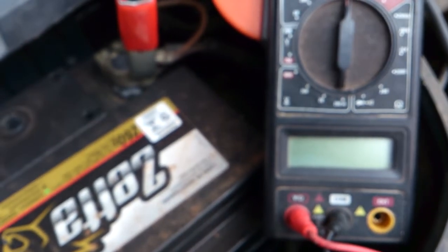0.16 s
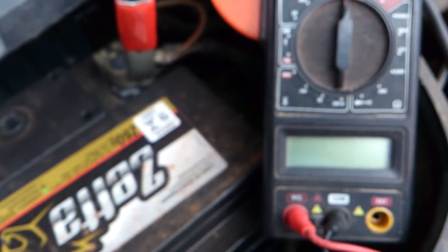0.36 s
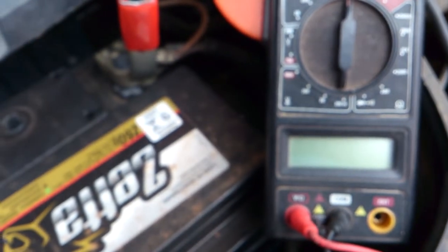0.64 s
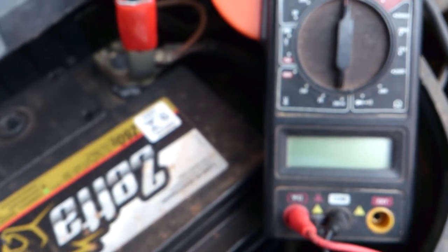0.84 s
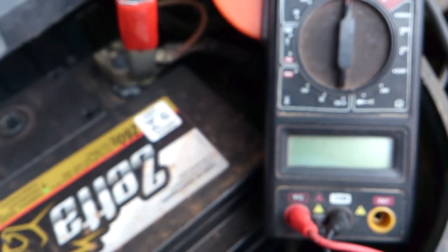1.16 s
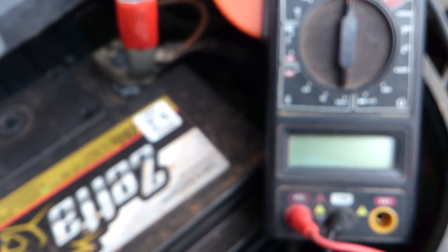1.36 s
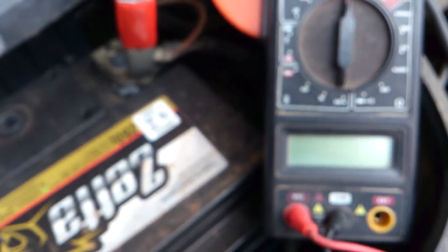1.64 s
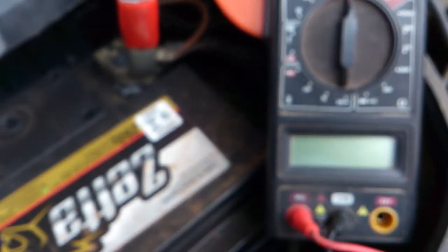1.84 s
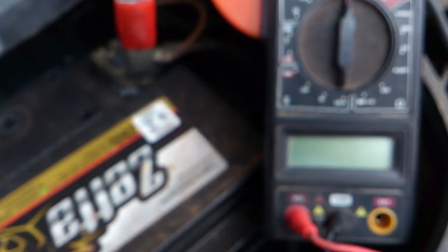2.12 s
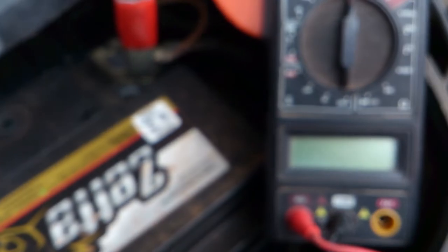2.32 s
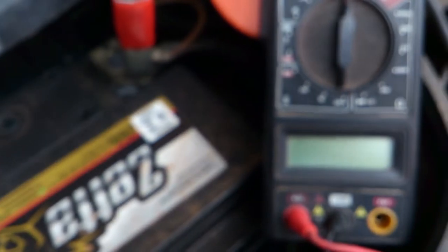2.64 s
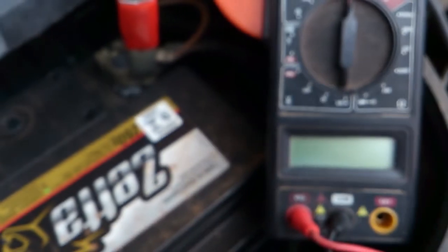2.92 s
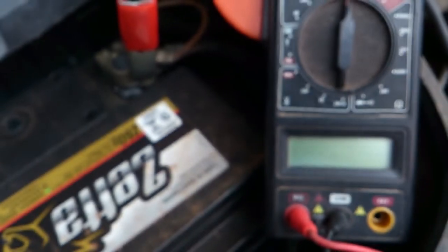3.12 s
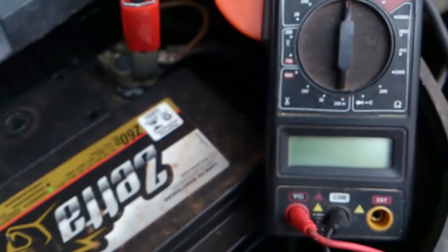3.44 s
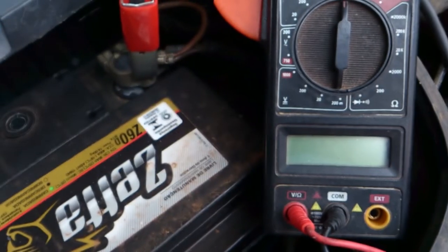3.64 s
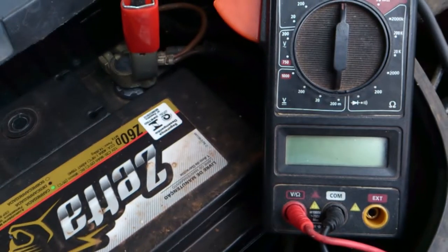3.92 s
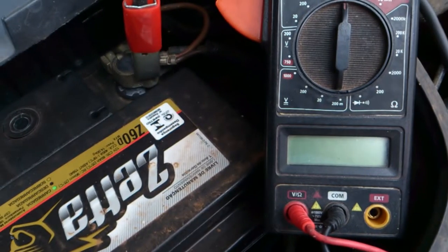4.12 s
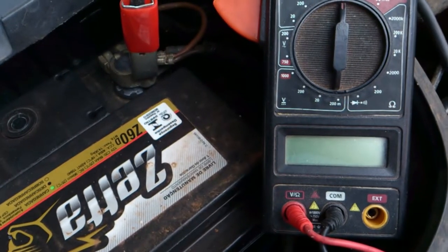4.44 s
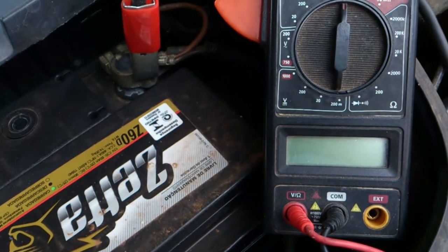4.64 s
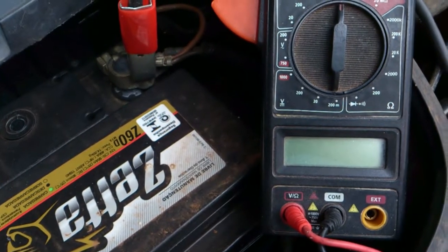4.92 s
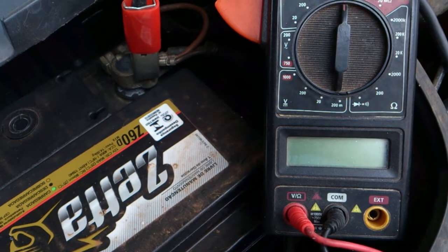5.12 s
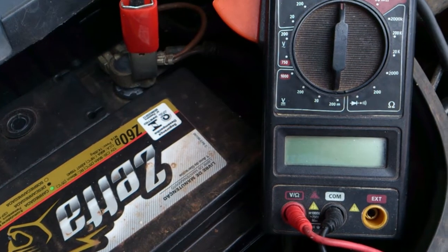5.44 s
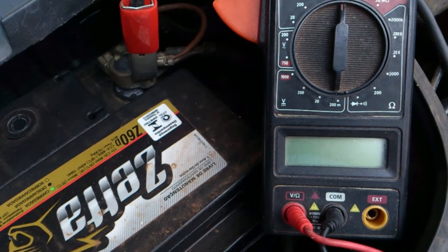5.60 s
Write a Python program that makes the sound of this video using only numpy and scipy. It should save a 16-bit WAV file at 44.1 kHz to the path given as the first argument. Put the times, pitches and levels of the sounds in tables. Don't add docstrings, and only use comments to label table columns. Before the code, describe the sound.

Close over a car's engine bay in a workshop, an engine idles with bright metallic ticking about eight times a second over a low boom and hiss. A spark snaps early and one cycle nearly misses. Switched off midway, it slows with a clack, a thump and whistling, rushing air. Then come scuffing, dull thuds, a hollow panel knock, thin hinge squeaks and small clicks over a faint distant engine drone.

```python
import sys
import numpy as np
from scipy import signal
from scipy.fft import rfft, irfft, next_fast_len
from scipy.io import wavfile
from scipy.ndimage import uniform_filter1d

SR = 44100
rng = np.random.default_rng(int(sys.argv[2]) if len(sys.argv) > 2 else 0)


def boost_factor(decibels):
    exponent = np.asarray(decibels, float) / 20
    return 10 ** exponent


def master_out(mix):
    frames = np.transpose(np.atleast_2d(mix))
    ceiling = np.clip(frames, -1, 1)
    pcm = np.round(ceiling * 32767).astype(np.int16)
    wavfile.write(sys.argv[1], SR, pcm)


N = 254438
TIME_S = np.arange(N) / SR

# (time [s], peak level [dB])
TAPPET_SNAPS = [(0.0865, -10), (0.2083, -11), (0.3286, -10), (0.4544, -12), (0.5768, -11), (0.6975, -10.5),
                (0.8187, -10.5), (0.9396, -11), (1.0589, -10.5), (1.1813, -11), (1.301, -10),
                (1.4205, -10.5), (1.5406, -10), (1.6615, -10.5), (1.7823, -10), (1.9031, -11),
                (2.0232, -9.5), (2.1439, -10), (2.266, -11.5), (2.3878, -11), (2.5106, -10.5),
                (2.631, -10.5), (2.7535, -11), (2.8738, -10.5), (2.995, -12.5), (3.116, -10), (3.248, -14),
                (3.4121, -15), (3.6531, -20.5), (4.0504, -42.5)]


def valve_gear(fresh=0.35, scatter_db=1.07, gear_db=-17, loose=0.49):
    # (delay [ms], cover level [dB], rocker level [dB], block level [dB], rattle length [ms])
    bounces = [
        (0, 3, -6.5, -29, 2.6),
        (1.6, 1, 1, -13, 4.5),
        (7.5, 0, -8.5, -8, 7.6),
    ]
    # (share of cycle [0-1], cover level [dB], rocker level [dB], block level [dB], rattle length [ms])
    soft_contacts = [(.27, -6.5, -32, -28, 4.7), (.296, -4, -34, -28.5, 6.7), (.39, -19, -42, -26, 5.2),
                     (.454, -27, -25, -18, 3.9), (0.506, -8, -40, -24.5, 3.6),
                     (.547, -4.5, -21, -19.5, 7.3), (.647, -21, -30, -11.5, 4.3),
                     (.701, -6.5, -20.5, -4, 11), (.769, -10, -13.5, -5, 11.6),
                     (.849, -33.5, -34.5, -13.5, 6.9), (.896, -16.5, -41, -15.5, 8.9)]
    # (frequency [Hz], level [dB], time to fall 60 dB [s])
    cover_modes = [(4340, -7, 0.001), (6160, 6, 0.0021), (6820, 9.5, 0.0012), (9090, 5.5, 0.0033),
                   (9270, 1, 0.012), (9960, 5.5, 0.0027), (11400, 5.5, 0.0016), (12490, 1.5, 0.0021),
                   (13493, -7, 0.002557), (15000, -13, 0.002077)]
    # (frequency [Hz], level [dB], time to fall 60 dB [s])
    rocker_modes = [(5197, 2.5, 0.026), (5680, -16.5, 0.015), (5200, 1.5, 0.0023)]
    # (frequency [Hz], level [dB], time to fall 60 dB [s])
    block_modes = [(547, -12.5, 0.03), (1014, -11, 0.036), (1760, -9.5, 0.013), (2168, -4, 0.017),
                   (2320, -4, 0.012), (2560, -3, 0.007), (3300, -2.5, 0.005), (4100, -2.5, 0.0053)]
    # (frequency [Hz], level [dB], time to fall 60 dB [s])
    spring_modes = [(3515.3, -14, .015), (4235, -14, 0.035), (7090, -3, 0.03)]

    starts = cycle_times()
    tappet_s, peak_db = np.transpose(TAPPET_SNAPS)
    contacts = [(starts + delay_ms / 1000, *rest) for delay_ms, *rest in bounces]
    contacts += [(starts[:-1] + share * np.diff(starts), *rest) for share, *rest in soft_contacts]

    force = np.zeros((3, N))
    t = np.arange(900) / SR
    blow = 1. * (t == 0)
    for times, *part_db, rattle_ms in contacts:
        habit = rng.standard_normal(900)
        dying = np.exp(-2000 * t / rattle_ms) / np.sqrt(rattle_ms * SR / 4000)
        for at in times:
            rattle = 4 * (habit + fresh * rng.standard_normal(900)) * dying
            on_rocker = 4 * blow + 0.039 * rattle
            on_block = rattle + loose * 4 * rng.standard_normal(900) * dying
            strength_db = np.interp(at, tappet_s, peak_db) + gear_db + np.array(part_db)
            strength = boost_factor(strength_db + scatter_db * rng.standard_normal(3))
            add(force, at, np.array([rattle, on_rocker, on_block]) * strength[:, None])

    late = np.r_[np.zeros(round(.0045 * SR)), force[1]][:N]
    cover = above(ring(force[0], cover_modes), 3222)
    rocker = ring(force[1], rocker_modes)
    block = above(ring(force[2], block_modes), 444.45)
    return cover + rocker + ring(late, spring_modes) + block


def engine_air():
    starts = cycle_times()
    cycle = np.interp(TIME_S, starts, np.arange(len(starts)))
    return crank_turning() * (intake_boom(cycle) + trembling_block() + hiss_and_whine(cycle))


def intake_boom(cycle, idle_db=-30.5, sag_db_per_s2=38, duct_db=46):
    cylinder_db = [
        -9,
        -3,
        0,
        -3,
    ]
    # (frequency [Hz], level [dB], time to fall 60 dB [s])
    box_modes = [(134.5, 0, .085)]
    # (frequency [Hz], level [dB], time to fall 60 dB [s])
    pipe_modes = [(232, -28, .25), (66, -30, .1), (430, -29, .15), (545, -27, .08), (166, -24, .3)]
    misfire_s, misfire_half_s, misfire_loss_db = 0.498, 0.099, 21
    switch_off_s = 3.03

    firing = np.floor(4 * (cycle + .15)).astype(int)
    at = np.flatnonzero(np.diff(firing, prepend=firing[0]))
    pulses = np.zeros(N)
    pulses[at] = boost_factor(np.array(cylinder_db)[firing[at] % 4] + .8 * rng.standard_normal(len(at)))
    boom = ring(ring(pulses, box_modes), box_modes) + boost_factor(duct_db) * ring(pulses, pipe_modes)
    boom /= np.sqrt(abs(uniform_filter1d(boom ** 2, SR // 4))) + 1

    misfire = np.maximum(1 - abs(TIME_S - misfire_s) / misfire_half_s, 0)
    sag_db = sag_db_per_s2 * np.maximum(TIME_S - switch_off_s, 0) ** 2
    return boost_factor(idle_db - misfire_loss_db * misfire - sag_db + 0.27 * drift(15)) * boom


def trembling_block():
    # (time [s], level [dB], rise [s], hold [s], fall [s])
    kicks = [
        (.52, -38.5, .15, .03, 0.1),
        (3.2, -43, .08, .07, .25),
        (3.46, -43, .15, 0.044, 0.22),
    ]
    return (boost_factor(-58) + swells(kicks)) * blown([(58.4, 9, 1), (64.0, 7.3, -3)])


def hiss_and_whine(cycle, whine_db=-50, throb_db=0.5):
    # (frequency [Hz], level per Hz [dB])
    hiss_colour = [(110, -32), (180, 0), (1370, -1.5), (2190, -3.5), (3010, -5), (5280, -9), (6030, -9),
                   (9460, -6.5), (11600, -12), (13800, -9.5), (16000, -37)]
    hiss = coloured(hiss_colour) * boost_factor(throb_db * np.cos(8 * np.pi * (cycle - .04)) + 1.2 * drift(35))
    hiss -= .35 * above(hiss, 10500)
    speed = np.clip(uniform_filter1d(np.gradient(cycle), 9000) * SR / 8.3, 0, 1)
    hiss_db = -33 + 20 * np.log10(speed + 0.0054)
    hiss -= (1 - speed) * above(hiss, 6542)
    turns = 176.5 * uniform_filter1d(cycle, 9000)
    whine = np.sin(2 * np.pi * turns + 0.45 * drift(20)) * boost_factor(whine_db + 3.6 * drift(8))
    return boost_factor(hiss_db) * hiss + whine * boost_factor(hiss_db + 36)


def inrush(width_hz=38, side_db=-5):
    # (time [s], frequency [Hz])
    whistle_pitch = [(3.3, 1175), (3.39, 1120), (3.44, 1186), (3.68, 1193), (3.795, 1072), (3.85, 1134)]
    # (frequency [Hz], width [Hz], level [dB])
    side_tones = [(1036, 19.23, 2), (1184, 45, -2), (1203, 25, 0.5), (1316, 29, -2.5)]
    # (frequency [Hz], width [Hz], level [dB])
    rush_tones = [(1992.1, 320, -4), (2730, 51, 5.5), (3210, 130, 8), (3550, 130, -3), (3830, 130, 3.5),
                  (4764, 624, -8.5), (6000, 930, -0.5), (7710, 894, -8), (9618, 830, -5.5)]
    # (time [s], whistle level [dB], rush level [dB])
    gulps = [
        (3.286, -30.5, -32),
        (3.368, -33, -43),
        (3.462, -44, -36),
    ]
    gulp_rise_s, gulp_fall_s = 0.019, 0.021
    draw_s, draw_rise_s = 3.43, 0.02
    whistle_end_s, whistle_end_db_per_s = 3.8, 110

    since = TIME_S - draw_s
    draw = boost_factor(20 * np.minimum(since / draw_rise_s, 0)) * crank_turning()
    ending_db = whistle_end_db_per_s * np.maximum(TIME_S - whistle_end_s, 0)
    whistle_gain = draw * boost_factor(-34.5 - 4 * since + 1.8 * drift(20) - ending_db)
    whistle_gain += swells([(s, db, gulp_rise_s, 0, gulp_fall_s) for s, db, _ in gulps])
    rush_gain = draw * boost_factor(-40 + 10 * since)
    rush_gain += swells([(s, db, gulp_rise_s, 0, gulp_fall_s) for s, _, db in gulps])

    whistle_hz, = in_time(whistle_pitch)
    phase = 2 * np.pi * np.cumsum(whistle_hz * (1 + 0.0121 * drift(23.8))) / SR
    whistle = drift(width_hz) * np.cos(phase) + drift(width_hz) * np.sin(phase)
    whistle += boost_factor(side_db) * blown(side_tones)
    broad = [(hz, 1.7 * width, level_db + 10 * np.log10(width)) for hz, width, level_db in rush_tones]
    rush = below(patchy(broad, patchy_db=2.0, rate=33), 11000)
    return boost_factor(-2) * whistle_gain * whistle + boost_factor(1) * rush_gain * above(rush, 1200.0)


def stray_spark():
    # (time [s], peak level [dB])
    snaps = [
        (0.3566, 1),
        (0.3604, -25),
        (0.365, -13),
    ]
    return crack(snaps, 0.014, [6500, 12500], -2.5) + crack(snaps, 0.016, [1800, 4800], -10)


def run_down_blows():
    # (time [s], peak level [dB])
    relay = [
        (3.361, -24),
    ]
    # (time [s], peak level [dB])
    shudder = [
        (3.39, -26.5),
    ]
    return crack(relay, 0.035, [1900, 4200], 3.5) + crack(shudder, 0.12, [250, 900], 8.8)


def thuds():
    # (time [s], peak level [dB], lowest tone [Hz])
    blows = [
        (3.387, -33, 198),
        (4.212, -28, 360),
        (4.232, -37, 445.1),
        (4.293, -36.5, 359),
        (5.304, -41, 165.4),
    ]
    out, t = np.zeros(N), np.arange(12000) / SR
    # (times the lowest tone, level [dB], time to fall 60 dB [s])
    overtones = [(1.0, 4, 0.076), (1.35, 4, 0.031), (1.9, -4, 0.0375), (2.5, -1, 0.02086)]
    for s, peak_db, hz in blows:
        for ratio, part_db, t60 in overtones:
            tone = np.sin(2 * np.pi * hz * ratio * t) * (1 - np.exp(-t / 0.0036))
            add(out, s, boost_factor(peak_db + part_db - 60 * t / t60) * tone)
    return out + crack([(s, peak_db) for s, peak_db, hz in blows], 0.091, [300, 1000], 6.8)


def scuff():
    # (time [s], level [dB], rise [s], hold [s], fall [s])
    strokes = [
        (3.93, -47.5, 0.087, 0.014, 0.086),
        (4.052, -56, 0.033, .003, 0.018),
        (4.11, -55.5, 0.048, 0.034, .1),
        (4.18, -42, 0.14, 0.03, 0.054),
        (4.33, -55.5, .1, .02, 0.22),
        (4.6, -68, .1, .03, .1),
    ]
    # (frequency [Hz], width [Hz], level [dB])
    rubbed = [(1060, 170, -4), (1520, 270, -7), (2090, 200, -2.5), (2670, 720, -6.5), (3250, 360, -3),
              (3700, 450, -3.5), (4940, 400, -7), (5900, 1200, -3), (7700, 320, -9), (9600, 2300, -2.5)]
    return swells(strokes) * boost_factor(1.5 * drift(60)) * below(patchy(rubbed, patchy_db=3.5, rate=13), 10800)


def settling_block():
    # (time [s], level [dB], rise [s], hold [s], fall [s])
    settling = [
        (3.92, -48.5, 0.054, 0.041, 0.23),
    ]
    # (frequency [Hz], width [Hz], level [dB])
    body = [(330, 440, -0.98), (720, 560, -1.1)]
    return swells(settling) * blown(body)


def panel_knock():
    # (time [s], level [dB], rise [s], hold [s], fall [s])
    shakes = [
        (4.7, -29, 0.053, 0.031, 0.13),
        (4.91, -50, 0.027, 0.0046, .08),
    ]
    # (frequency [Hz], width [Hz], level [dB])
    panel = [(60.12, 20, -3), (98, 13, -1), (155, 29, 0), (292.62, 39, -8), (354, 26, -5.5), (481, 47, -6),
             (546, 33, -21)]
    # (time [s], level [dB], rise [s], hold [s], fall [s])
    slaps = [
        (4.69, -34.5, 0.025, 0.037, 0.089),
    ]
    # (frequency [Hz], level per Hz [dB])
    slap_colour = [(350, -23), (600, 4.5), (677, -1.5), (2040, -6), (4840, -9.5), (7450, -17.5),
                   (10300, -10), (13500, -29), (15800, -45)]
    # (time [s], peak level [dB], frequency [Hz], time to fall 60 dB [s])
    booms = [
        (4.698, -21.5, 96, .25),
        (4.752, -24, 58, .2),
        (4.788, -30, 130, .15),
    ]
    knock = swells(shakes) * boost_factor(3.8 * drift(29.0)) * blown(panel)
    knock += swells(slaps) * boost_factor(2.3 * drift(59)) * coloured(slap_colour)
    t = np.arange(12000) / SR
    for s, peak_db, hz, t60 in booms:
        add(knock, s, boost_factor(peak_db - 60 * t / t60) * np.sin(2 * np.pi * hz * t) * (t < t[-1]))
    return knock


def squeaks(fall=.015, third_db=-12, trim_db=-3):
    # (time [s], peak level [dB], pitch [Hz], length [ms], octave level [dB])
    hinge_squeaks = [(4.30, -50, 3300, 26.4, -7), (4.368, -51, 3550, 17, -16),
                     (4.595, -57.5, 3598, 45, -14), (4.75, -42, 5750, 20, -16),
                     (4.82, -47, 5900, 29, -13.5), (4.853, -52, 5140, 17, 6), (4.874, -50, 4200, 24, -8),
                     (4.908, -46.5, 5620, 36, -5), (4.945, -53, 5380, 21.35, 6),
                     (4.988, -52, 5200, 19.6, 3.5), (5.078, -47, 3550, 16.18, -8.5),
                     (5.115, -49.5, 3500, 30, -8), (5.152, -50, 3500, 25.25, -8),
                     (5.66, -59, 1454, 120, -20.5), (5.63, -68.5, 2020, 110, -20)]
    out = np.zeros(N)
    for s, peak_db, hz, length_ms, octave_db in hinge_squeaks:
        u = np.linspace(0, 1, round(length_ms * SR / 1000))
        wobble, grip = uniform_filter1d(rng.standard_normal((2, len(u))), size=60) * np.sqrt(60)
        phase = 2 * np.pi * np.cumsum(hz * (1 + fall * (.5 - u) + .014 * wobble)) / SR
        tone = np.sin(phase) + boost_factor(octave_db) * np.sin(2 * phase)
        tone += boost_factor(third_db) * (hz < 4000) * np.sin(3 * phase)
        add(out, s, boost_factor(peak_db + trim_db + 3.0 * grip) * tone * np.sin(np.pi * u ** 0.39))
    return out


def clicks():
    # (time [s], peak level [dB])
    touches = [(3.9969, -33), (4.0487, -38), (4.2334, -29.5), (4.6862, -37), (5.3122, -28.5), (5.4087, -42)]
    return crack(touches, 0.052, [1400, 10500], -11.0)


def background():
    # (time [s], firing rate [Hz], level [dB], load [0-1])
    far_engine = [(3.92, 49, -75, 0), (4.04, 50.2, -43.5, 0.02), (4.3, 52.3, -41, 0), (4.43, 50.2, -64, .2),
                  (4.54, 48.83, -49, 0.2), (4.9, 53.3, -43, 0.16), (5.22, 53.83, -45.5, .5),
                  (5.34, 56.2, -43.5, 0.8), (5.7, 57.3, -40.5, 1), (5.77, 59, -42, 0.6)]
    idling_db = [0.5, -4.5, -27, -23]
    under_load_db = [2.5, -24, -10, -9]
    # (frequency [Hz], level per Hz [dB])
    shop_air = [(18, -29), (30, 5.5), (70, 4), (109, 1.5), (199, -6.5), (415, -15.5), (822, -16),
                (988, -11.5), (1160, -20), (2230, -20), (5310, -28.5), (9710, -28), (16000, -40.5)]
    # (frequency [Hz], width [Hz], level [dB])
    lamp = [(9700, 200, 0)]
    hz, level_db, load = in_time(far_engine)
    phase = 2 * np.pi * np.cumsum(hz) / SR
    drone = 0
    for k, (idle_db, loaded_db) in enumerate(zip(idling_db, under_load_db)):
        harmonic_db = level_db + idle_db + load * (loaded_db - idle_db) + 1.7 * drift(19)
        drone = drone + boost_factor(harmonic_db) * np.cos((k + 1) * phase)
    return drone + boost_factor(-49.5 + 0.51 * drift(3)) * coloured(shop_air) + boost_factor(-74) * blown(lamp)


def shop(x, t60=0.56):
    t = np.arange(round(.6 * SR)) / SR
    tail = signal.lfilter([.3], [1, -.7], rng.standard_normal(len(t))) * boost_factor(-60 * t / t60) * (t > .008)
    return signal.fftconvolve(x, tail / np.sqrt(np.sum(tail ** 2)))[:N]


def cycle_times():
    s = np.array(TAPPET_SNAPS)[:, 0]
    return np.r_[2 * s[0] - s[1], s]


def crank_turning():
    return boost_factor(-324 * np.maximum(TIME_S - 3.872, 0))


def crack(events, t60, edge_hz, trim_db):
    out, t = np.zeros(N), np.arange(3000) / SR
    for s, peak_db in events:
        splinters = rng.standard_normal(3000) * (boost_factor(-60 * t / t60) + 0.19 * boost_factor(-12 * t / t60))
        add(out, s, boost_factor(peak_db + trim_db) * (splinters + 2.143 * (t == 0)))
    return signal.sosfilt(signal.butter(2, edge_hz, "band", fs=SR, output="sos"), out)


def ring(force, modes):
    out = 0
    for k, (hz, level_db, t60) in enumerate(modes):
        r, w = boost_factor(-60 / (t60 * SR)), 2 * np.pi * hz / SR
        mode = signal.lfilter([0, np.sin(w)], [1, -2 * r * np.cos(w), r * r], force + 1e-18)
        out = out + (-1) ** k * boost_factor(level_db) * mode
    return out


def blown(peaks):
    modes = [(hz, db + 10 * np.log10(width), np.log(1000) / np.pi / width) for hz, width, db in peaks]
    return rms_one(ring(rng.standard_normal(N), modes))


def patchy(peaks, patchy_db, rate):
    return rms_one(sum(boost_factor(level_db + patchy_db * drift(rate)) * blown([(hz, width, 0)])
                       for hz, width, level_db in peaks))


def coloured(spectrum):
    size = 2 * next_fast_len(N // 2 + 1)
    hz = np.arange(size // 2 + 1) * SR / size + 1
    points = np.array(spectrum)
    gain = boost_factor(np.interp(np.log(hz), np.log(points[:, 0]), points[:, 1]))
    return rms_one(irfft(rfft(rng.standard_normal(size)) * gain)[:N])


def drift(rate):
    r = np.exp(-80 * np.pi * rate / SR)
    slow = signal.lfilter([1], [1, -2 * r, r * r], rng.standard_normal(N // 40 + 2002))[2000:]
    return np.interp(np.arange(N) / 40, np.arange(len(slow)), rms_one(slow))


def swells(rows):
    t = TIME_S
    return sum(boost_factor(db - 20 * np.maximum(np.maximum((s - t) / rise, (t - s - hold) / fall), 0))
               for s, db, rise, hold, fall in rows)


def in_time(rows):
    s, *columns = np.transpose(rows)
    return [np.interp(TIME_S, s, c) for c in columns]


def add(track, s, sound):
    i = round(s * SR)
    if 0 <= i < N:
        track[..., i:i + sound.shape[-1]] += sound[..., :N - i]


def rms_one(x):
    return x / np.sqrt(np.mean(x ** 2) + 1e-20)


def above(x, edge_hz):
    return signal.sosfilt(signal.butter(2, edge_hz, "high", fs=SR, output="sos"), x)


def below(x, edge_hz):
    return signal.sosfilt(signal.butter(2, edge_hz, "low", fs=SR, output="sos"), x)


def scene():
    blows = valve_gear() + stray_spark() + run_down_blows()
    blows += thuds() + scuff() + settling_block() + panel_knock() + squeaks() + clicks()
    return (blows + boost_factor(-16.0) * shop(blows) + engine_air() + inrush() + background())[None]


def band_limit(x):
    return signal.sosfilt(signal.butter(12, 16470, fs=SR, output="sos"), x)


def record(dry):
    overload = .95
    thin = signal.sosfilt(signal.butter(3, 48, "high", fs=SR, output="sos"), dry)
    rounded = overload * np.tanh(thin / overload)
    cut = signal.sosfilt(signal.cheby2(6, 50, 17200, fs=SR, output="sos"), rounded)
    return band_limit(cut)


dry = scene()
out = record(dry)
master_out(out)
```